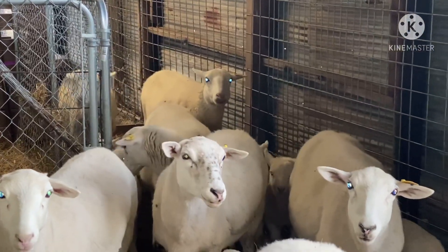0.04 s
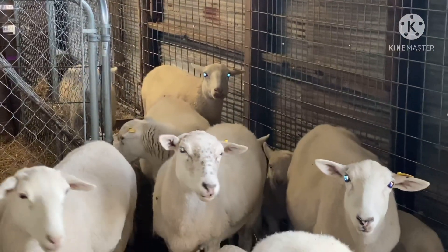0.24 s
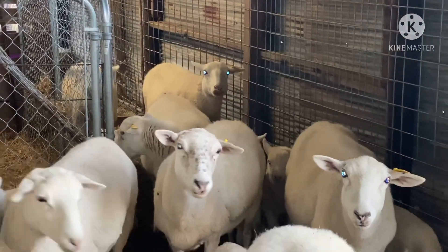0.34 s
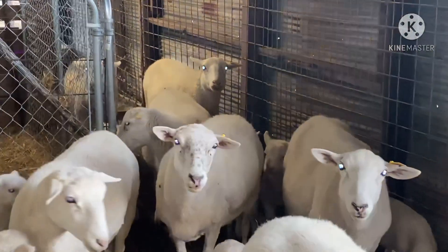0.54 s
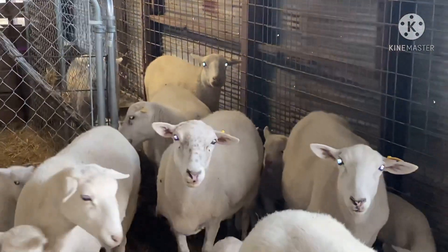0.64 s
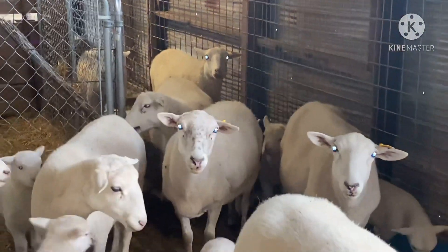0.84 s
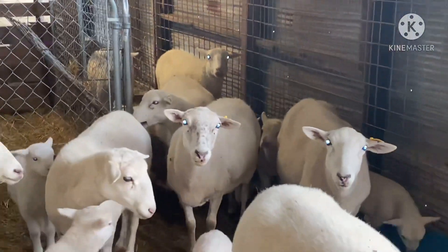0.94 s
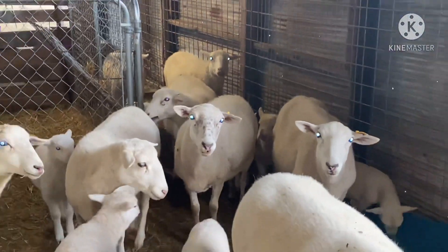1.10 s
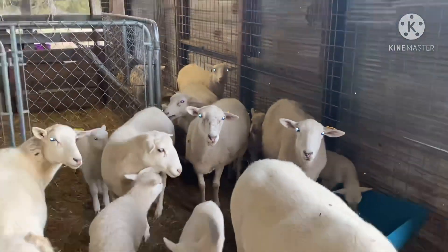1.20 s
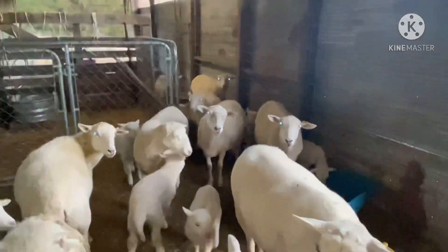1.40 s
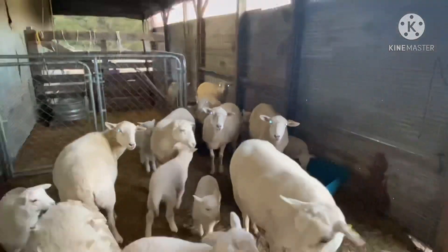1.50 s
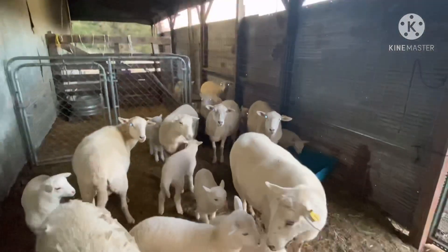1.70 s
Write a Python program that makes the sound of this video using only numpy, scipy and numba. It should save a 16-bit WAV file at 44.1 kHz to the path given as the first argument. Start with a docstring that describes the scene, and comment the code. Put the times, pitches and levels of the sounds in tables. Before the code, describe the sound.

A sheep bleats once, close by in a barn pen. Soft hoof thuds and a scuff of straw come in the first 0.3 seconds. The bleat runs from about 0.2 to 1.1 seconds, hoarse and rapidly quavering, with a short echo. Faint ticks, straw rustles and hoof steps follow over quiet barn air, ending with a short, light knock at about 1.7 seconds.

```python
"""Sheep bleating in a barn

One long, hoarse bleat quavers about fifteen times a second. Glottal pulses and breath noise excite
the resonances of the vocal tract, which change as the mouth opens and then narrows. The flock
shuffles in the straw, with a few ticks, hoof steps and a last sharp knock. The pen boards
reflect the bleat and the hooves, and the barn reverberates briefly."""
import sys
import numpy as np
from scipy import signal
from scipy.fft import rfft, irfft
from scipy.io import wavfile
from scipy.ndimage import uniform_filter1d
from numba import njit

SR = 44100
rng = np.random.default_rng(int(sys.argv[2]) if len(sys.argv) > 2 else 0)


def log_audio(samples):
    """Write samples as a 16-bit WAV file to the path given in sys.argv[1]."""
    # one column per channel
    frames = np.atleast_2d(samples).T
    # limit to full scale, then quantise
    limited = np.clip(frames, -1, 1)
    pcm = np.round(limited * 32767).astype(np.int16)
    wavfile.write(sys.argv[1], SR, pcm)


N = 77175
T = np.arange(N) / SR

# Left-right coherence of the diffuse field: frequency_hz, correlation
COHERENCE = [(100, 0.88), (300, 0.38), (700, -0.16), (1500, 0.74), (4000, 0.72), (6500, 1), (8500, -0.15),
             (14000, 0.019)]
# Spectrum of the still barn air: frequency_hz, level_db
AIR_SPECTRUM = [(25, -12), (60, 3), (160, -5), (300, -8.5), (500, -15.5), (800, -16.5), (1500, -27),
                (4000, -34), (10000, -32), (15500, -28)]
# Spectrum of the reverberation: frequency_hz, level_db
REVERB_SPECTRUM = [(100, -5.5), (200, -9.5), (330, -2), (500, -6.5), (750, -7), (1700, -6), (3000, -2.5),
                   (6000, -2), (9000, 5), (14000, -4.5)]
# First reflections from the pen, left then right: delay_s, gain_db
PEN_REFLECTIONS = [(.0042, -7.5), (.0051, -23)]
# Scuffs in the straw: centre_s, half_width_s, level_db
STRAW_SCUFFS = [(.165, 0.029, -48), (.25, 0.051, -38.5), (1.45, 0.027, -64), (1.66, 0.18, -65.5)]
# Spectrum of a scuff: frequency_hz, level_db
SCUFF_SPECTRUM = [(100, -11.5), (260, -2.5), (400, -2), (750, 2.5), (1150, -3), (1450, -11.5),
                  (2200, -10.5), (3000, -15.5), (4000, -22), (12000, -44.5)]
# Rustles of dry straw: centre_s, half_width_s, level_db
STRAW_RUSTLES = [(.14, 0.089, -70), (1.16, 0.028, -64), (1.225, 0.038, -66.5), (1.44, 0.037, -67.5),
                 (1.63, 0.11, -67.5)]
# Spectrum of a rustle: frequency_hz, level_db
RUSTLE_SPECTRUM = [(500, -38), (1500, 4), (3500, 0.5), (6200, -1), (8500, 0), (11000, 5), (15000, -30)]
# Soft hoof falls: start_s, level_db, pitch_hz
HOOF_THUDS = [(0.061, -46.5, 219), (0.141, -41.5, 135), (0.153, -33.5, 230), (0.213, -33.5, 222),
              (0.232, -43, 83), (1.025, -47, 107.6), (1.173, -46, 381), (1.499, -50, 167),
              (1.573, -51, 175), (1.741, -40, 180)]
# Hooves striking the pen, and the sharp start of a straw scuff: start_s, level_db, centre_hz, t60_s
HOOF_KNOCKS = [(0.126, -53, 840, 0.091), (0.157, -55, 2770, 0.18), (1.145, -45.5, 6200, 0.014),
               (1.144, -47, 10800, 0.016), (1.17, -52, 3740, 0.013), (1.212, -53, 5650, 0.019),
               (1.459, -53.5, 1240, 0.0094), (1.603, -47.5, 2690, 0.027), (1.652, -57, 3600, 0.023),
               (1.675, -44, 756, 0.019), (1.741, -45, 810, 0.11), (1.741, -41.5, 324, 0.041)]

# Crests of the quaver: time_s, pitch_hz, tract_gain_db, hum_level_db
QUAVER_CRESTS = [(0.23, 140.6, 2.5, -38.5), (0.298, 146.3, -1.5, -45.5), (0.366, 158.9, -1, -34),
                 (0.425, 163.5, 1.5, -38), (0.485, 161.3, 0.5, -38), (0.547, 161.1, -1.5, -38.5),
                 (0.617, 161.1, -2, -42), (0.683, 161, -1.5, -40.5), (0.753, 159, 3.5, -39.5),
                 (0.829, 155.2, 4, -37), (0.903, 152.5, 4, -36), (0.965, 150, -0.5, -37.5),
                 (1.035, 147.8, -11.5, -47.5)]
# Course of the bleat: time_s, tract_level_db, mouth_hz, mouth_gain_db, upper_gain_db
BLEAT_COURSE = [(.2, -52, 1620, -14, -10), (.23, -40.5, 1616, -2, 4), (.275, -41.5, 1700, 1, 7),
                (.305, -33, 1684, 2.5, 4), (.42, -35, 1698, 3, 4), (.53, -30.5, 1765, -3, 1.5),
                (.63, -29, 1762, 1, 1), (.72, -32.5, 1734, -5.5, -2), (.80, -35, 1627, -8.5, -2.5),
                (.92, -34.5, 1639, -11, -8.5), (.978, -29.5, 1588, 0, -6), (1.02, -29.5, 1584, -46, -15.5),
                (1.07, -48.5, 1603, -15, -1)]
# Hoarseness of the voice: time_s, noise_power_fraction
HOARSENESS = [(.22, 0.45), (.33, 0.32), (.42, 0.09), (.75, 0.47), (1.0, 0.26)]
# Main formant: time_s, centre_hz
VOWEL_FORMANT = [(.23, 767), (.45, 752), (.66, 738), (.78, 736), (.88, 728), (.98, 734.4)]
# Low formants of the gruff voice: centre_hz, width_hz, gain_db
GRUFF_FORMANTS = [(585, 84, -5), (623, 50, -5.5)]
# Upper formants, present throughout: centre_hz, width_hz, gain_db
UPPER_FORMANTS = [(2346, 330, -3.5), (2515, 137, -4.5), (2809, 277, -6), (4550, 930, -26.5)]
# Bright formants of the wide-open mouth: centre_hz, width_hz, gain_db
OPEN_FORMANTS = [(4550, 440, -23.5), (6240, 400, -21.5)]
# Formants of the narrowed mouth: centre_hz, width_hz, gain_db
NARROW_FORMANTS = [(3090, 253, -12.5), (3630, 212, -17)]
# Strength of the broadband rasp in the throat: time_s, gain_db
RASP_COURSE = [(.265, -13.5), (.3, 0), (.45, -1.5), (.62, -3.5), (.8, -4), (.97, -4.5)]
# Spectrum of that rasp: frequency_hz, level_db
RASP_SPECTRUM = [(200, -11.5), (500, 8.5), (1000, 9), (2200, -2), (3400, 10), (4000, -16.5), (4600, -5),
                 (5200, -7), (5750, -11.5), (6300, -12), (8000, -21.5), (12000, -32), (14000, -62)]
# Hum, the clean bottom of the voice: harmonic_number, gain_db
HUM_HARMONICS = [(1, -4.5), (2, -14)]
# Clean overtones: harmonic_number, open_level_db, narrow_level_db
CLEAR_HARMONICS = [(3, -50, -47.5), (4, -31, -35), (6, -63.5, -39), (7, -50.5, -65.5)]

BLEAT_START_S, BLEAT_END_S = 0.1894, 1.109


def from_db(db):
    """Amplitude ratio of a level in decibels."""
    return 10 ** (np.asarray(db) / 20)


def unit_rms(x):
    """Normalisation to unit mean power."""
    return x / np.sqrt(np.mean(x ** 2) + 1e-20)


def curves(rows):
    """Linear interpolation of each column over the times in the first."""
    times, *columns = np.transpose(rows)
    return [np.interp(T, times, column) for column in columns]


def per_bin(spectrum):
    """Interpolation of a spectrum onto the FFT bins, in log frequency."""
    hz, values = np.transpose(spectrum)
    return np.interp(np.log(np.fft.rfftfreq(N, 1 / SR) + 1), np.log(hz), values)


def colour(x, spectrum):
    """Filtering by multiplication in the frequency domain."""
    return irfft(rfft(x) * from_db(per_bin(spectrum)), N)


def band(x, low_hz, high_hz):
    """Second-order Butterworth band-pass."""
    edges_hz = [max(low_hz, 20), min(high_hz, SR / 2 - 20)]
    return signal.sosfilt(signal.butter(2, edges_hz, "band", fs=SR, output="sos"), x)


def drift(corner_hz):
    """Random fluctuation: low-passed noise of unit rms."""
    pole = np.exp(-2 * np.pi * corner_hz / SR)
    return unit_rms(signal.lfilter([1], [1, -2 * pole, pole * pole], rng.standard_normal(2 * N))[N:])


def decay(start_s, attack_s, t60_s):
    """Exponential damping: after a quick rise, the envelope loses 60 dB in t60_s."""
    age = np.maximum(T - start_s, 0)
    return (1 - np.exp(-age / attack_s)) * 1000 ** (-age / t60_s)


def diffuse_field(spectrum):
    """Noise from all directions is only partly coherent between left and right; unit rms."""
    coherence = np.clip(per_bin(COHERENCE), -1, 1)
    mid, side = rfft(rng.standard_normal((2, N)))
    stereo = irfft(np.sqrt(1 + coherence) * mid + np.sqrt(1 - coherence) * side * [[1], [-1]], N)
    return unit_rms(colour(stereo, spectrum))


def barn_air(level_db=-62.5):
    """The ambient noise of the barn is a steady diffuse field."""
    return from_db(level_db) * diffuse_field(AIR_SPECTRUM)


def barn_reverb(x, gain_db=-2, delay_s=0.00077, crossover_hz=2200, mode_hz=715, mode_db=-61.5):
    """Reverberation: straw and fleece absorb the treble first, and one mode of the pen rings longer."""
    noise = diffuse_field(REVERB_SPECTRUM)
    low = signal.sosfiltfilt(signal.butter(2, crossover_hz, fs=SR, output="sos"), noise)
    tail = low * decay(delay_s, attack_s=0.0066, t60_s=0.32)
    tail += (noise - low) * decay(delay_s, attack_s=0.00059, t60_s=0.12)
    tail /= np.sqrt(np.sum(tail ** 2) / 2)
    tail += from_db(mode_db) * decay(delay_s, attack_s=0.0081, t60_s=0.38) * np.sin(2 * np.pi * mode_hz * T)
    return from_db(gain_db) * signal.fftconvolve(x[None], tail, axes=1)[:, :N]


def pen_reflections(x):
    """Early reflection: the boards return one delayed, dull copy to each side."""
    dull = band(x, low_hz=216, high_hz=1110)
    return np.array([from_db(db) * np.interp(T - delay_s, T, dull, left=0)
                     for delay_s, db in PEN_REFLECTIONS])


def straw(events, spectrum, grain_db):
    """Friction noise of pushed straw: Gaussian swells with a grainy amplitude modulation."""
    swell = sum(from_db(db) * np.exp(-((T - centre_s) / half_width_s) ** 2)
                for centre_s, half_width_s, db in events)
    return swell * unit_rms(diffuse_field(spectrum) * from_db(grain_db * drift(290)))


def hoof_thuds(attack_s=0.0017, t60_cycles=21.3):
    """Damped oscillation: the soft floor answers each hoof with a low, dying sinusoid."""
    return sum(from_db(db) * decay(start_s, attack_s, t60_cycles / hz)
               * np.sin(2 * np.pi * hz * (T - start_s)) for start_s, db, hz in HOOF_THUDS)


def hoof_knocks(attack_s=0.00063, width_octaves=0.5):
    """Impact noise: each hard contact with the pen, and the sharp start of a scuff, excites a decaying band of
    frequencies."""
    spread = 2 ** (width_octaves / 2)
    knocks = np.zeros(N)
    for start_s, db, hz, t60_s in HOOF_KNOCKS:
        noise = unit_rms(band(rng.standard_normal(N), hz / spread, hz * spread))
        knocks += from_db(db) * decay(start_s, attack_s, t60_s) * noise
    return knocks


@njit
def resonator(x, angle, radius):
    """Two-pole resonance: the pole angle sets the moving centre, the radius the damping."""
    y = np.zeros(len(x))
    for i in range(2, len(x)):
        y[i] = x[i] - x[i - 2] + 2 * radius * np.cos(angle[i]) * y[i - 1] - radius * radius * y[i - 2]
    return y


def formant(x, hz, width_hz):
    """One resonance of the vocal tract, with steepened skirts and its running rms held near 1."""
    ring = resonator(x, 2 * np.pi * hz / SR * np.ones(N), np.exp(-np.pi * width_hz / SR))
    reach_hz = (3.5 * width_hz + np.ptp(hz)) / 2
    ring = band(ring, np.mean(hz) - reach_hz, np.mean(hz) + reach_hz)
    return ring / np.sqrt(uniform_filter1d(ring * ring, size=2000) + 1e-12)


def formant_bank(x, formants):
    """Superposition of parallel resonances driven by one source."""
    return sum(from_db(db) * formant(x, hz, width_hz) for hz, width_hz, db in formants)


def quaver_dip(lag_s=0):
    """Modulation of the quaver: 0 on each broad crest, 1 in the narrow dip between two."""
    crests_s = np.array(QUAVER_CRESTS)[:, 0]
    crest_count = np.interp(T - lag_s, crests_s, np.arange(len(crests_s)))
    return np.abs(np.sin(np.pi * crest_count)) ** 3


def harmonic(cycles, number):
    """A sinusoid of unit rms at a whole multiple of the fundamental."""
    return np.sqrt(2) * np.sin(2 * np.pi * round(number) * cycles)


def glottis(cycles, hoarse, shimmer_db=0.03, air_pulsing=0.49, extra_noise=0.35):
    """Phonation: each cycle gives a pulse and modulates breath noise. Returns a mix and a rougher one."""
    pulses = unit_rms(np.diff(np.floor(cycles), prepend=0) * from_db(shimmer_db * drift(120)))
    breath = unit_rms(rng.standard_normal(N) * np.exp(-air_pulsing * (cycles % 1)))
    shares = hoarse, np.clip(hoarse + extra_noise, 0, 1)
    return [np.sqrt(1 - share) * pulses + np.sqrt(share) * breath for share in shares]


def vocal_tract(voice, rough, dip, late_dip, clear, narrowed):
    """Formant filtering: the resonances of throat and mouth shift in pitch and weight over the call."""
    level_db, mouth_hz, mouth_db, upper_db = curves(BLEAT_COURSE)
    opened = np.interp(T, (0.33, 0.24, 0.53), [0, 1, 0])   # weight of the wide-open mouth
    gruff = 1 - clear
    vowel_db = 1.5 - 1.5 * narrowed * dip - 2 * gruff
    vowel = from_db(vowel_db) * formant(voice, curves(VOWEL_FORMANT)[0], width_hz=57)
    growl = from_db(-22.5 * late_dip) * gruff * formant_bank(rough, GRUFF_FORMANTS)
    mouth = from_db(mouth_db) * formant(voice, mouth_hz, width_hz=44)
    upper = from_db(upper_db) * formant_bank(rough, UPPER_FORMANTS)
    upper += opened * formant_bank(rough, OPEN_FORMANTS)
    upper += narrowed * formant_bank(voice, NARROW_FORMANTS)
    upper *= from_db(-5 * dip)
    rasp = from_db(curves(RASP_COURSE)[0] - 6 * dip) * unit_rms(colour(rough, RASP_SPECTRUM))
    return from_db(level_db) * (vowel + growl + mouth + upper + rasp)


def hum(cycles, hoarse, fade_s=0.12):
    """The lowest harmonics of the vocal folds; hoarseness weakens all but the fundamental."""
    tone = sum(from_db(db) * (1 - hoarse if number > 1 else 1) * harmonic(cycles, number)
               for number, db in HUM_HARMONICS)
    return tone * np.clip((BLEAT_END_S - T) / fade_s, 0, 1) ** 2


def overtones(cycles, narrowed):
    """Periodic vibration gives clean harmonics, whose balance shifts as the mouth narrows."""
    return sum(from_db(open_db + (narrow_db - open_db) * narrowed) * harmonic(cycles, number)
               for number, open_db, narrow_db in CLEAR_HARMONICS)


def bleat(pitch_dip_hz=14, jitter=0.0069, fade_s=0.052):
    """Source and filter: the vocal folds drive the tract, and pitch and level quaver together."""
    dip, late_dip = quaver_dip(), quaver_dip(lag_s=0.0028)   # the low parts swell a little late
    crest_hz, crest_db, hum_db = curves(QUAVER_CRESTS)
    pitch_hz = (crest_hz - pitch_dip_hz * dip) * (1 + jitter * drift(70))
    cycles = np.cumsum(pitch_hz) / SR
    hoarse = np.clip(curves(HOARSENESS)[0], 0, 1)
    clear = np.interp(T, (0.319, 0.41, 0.976, 1.02), [0, 1, 1, 0])   # 1 while the folds swing regularly
    narrowed = np.interp(T, (0.59, 0.81), [0, 1])   # the mouth narrows
    voice, rough = glottis(cycles, hoarse)
    call = from_db(crest_db) * vocal_tract(voice, rough, dip, late_dip, clear, narrowed)
    call += from_db(hum_db - 14 * late_dip) * hum(cycles, hoarse)
    call += from_db(-18.5 * late_dip) * clear * overtones(cycles, narrowed)
    return call * np.clip(np.minimum(T - BLEAT_START_S, BLEAT_END_S - T) / fade_s, 0, 1)


def scene():
    """Superposition of direct sound, early reflections, reverberation, straw and ambient noise."""
    soft, knocks = bleat() + hoof_thuds(), hoof_knocks()
    direct = soft + knocks
    scuffs = straw(STRAW_SCUFFS, SCUFF_SPECTRUM, grain_db=3.5)
    rustles = straw(STRAW_RUSTLES, RUSTLE_SPECTRUM, grain_db=2)
    reverb = barn_reverb(soft + from_db(-9) * knocks)   # knocks sound drier than the bleat and thuds
    return direct + pen_reflections(direct) + reverb + scuffs + rustles + barn_air()


def record(dry, low_cut_hz=41, stopband_hz=16700):
    """Band limiting: the microphone loses the deepest bass, and the top is cut steeply."""
    heard = signal.sosfilt(signal.butter(2, low_cut_hz, "high", fs=SR, output="sos"), dry)
    return signal.sosfilt(signal.cheby2(14, 70, stopband_hz, fs=SR, output="sos"), heard)


dry = scene()
out = record(dry)
log_audio(out)
```